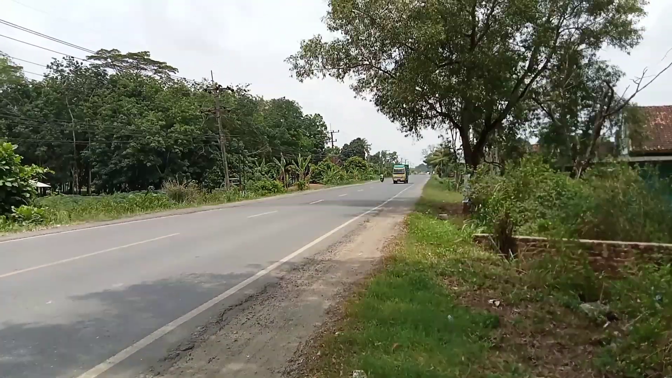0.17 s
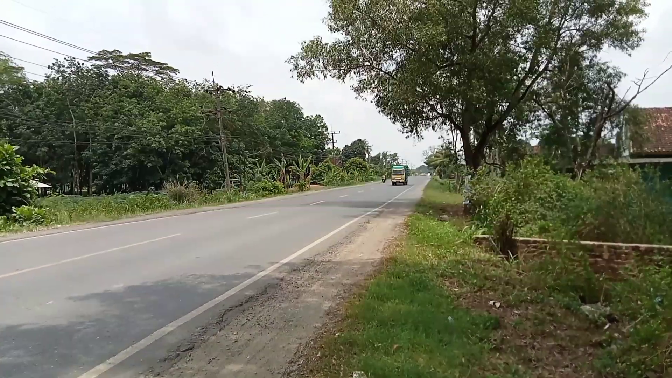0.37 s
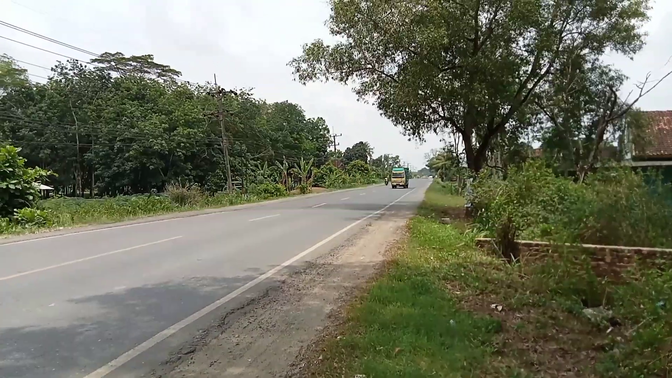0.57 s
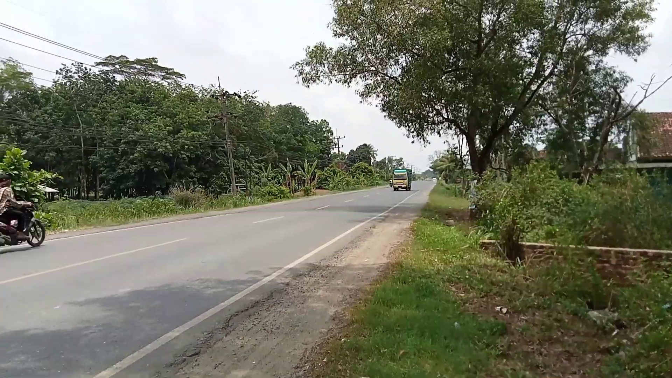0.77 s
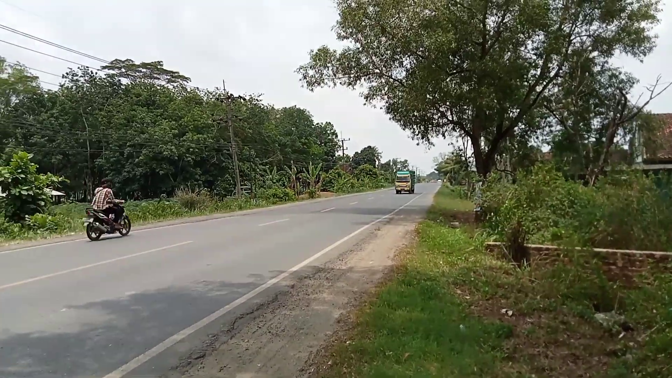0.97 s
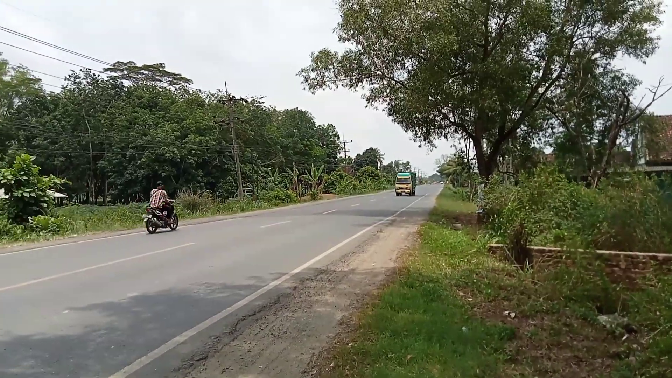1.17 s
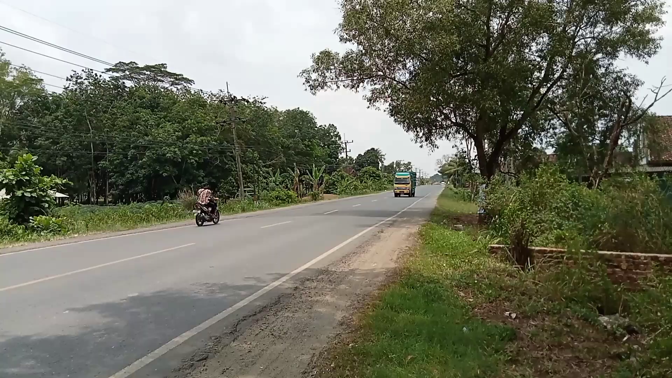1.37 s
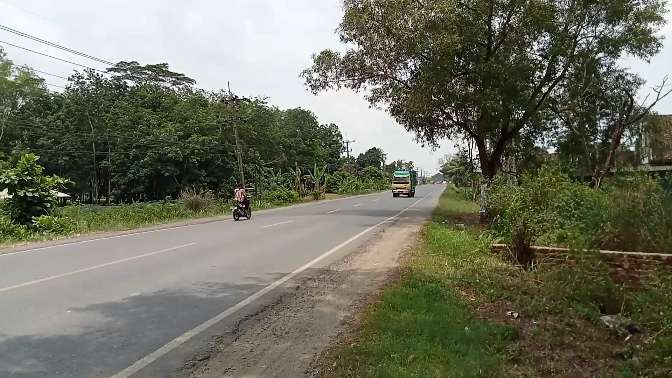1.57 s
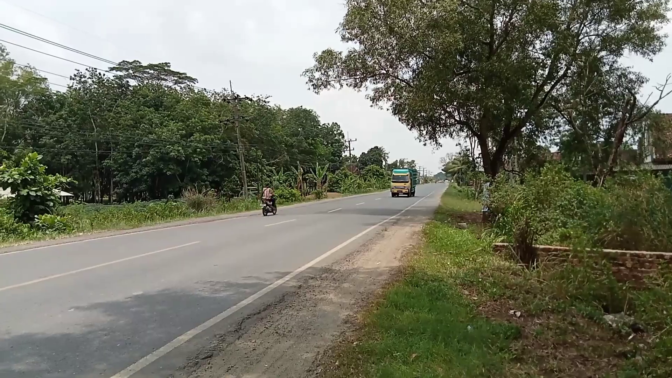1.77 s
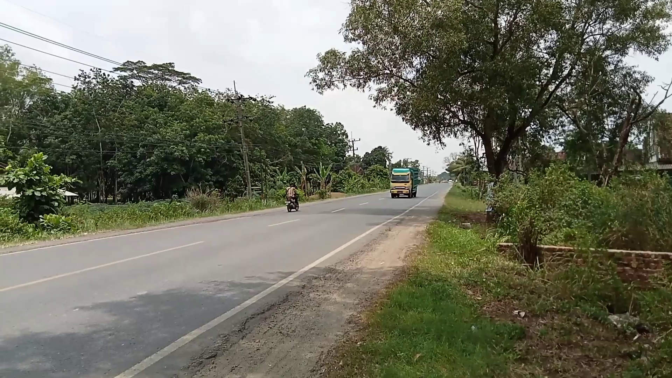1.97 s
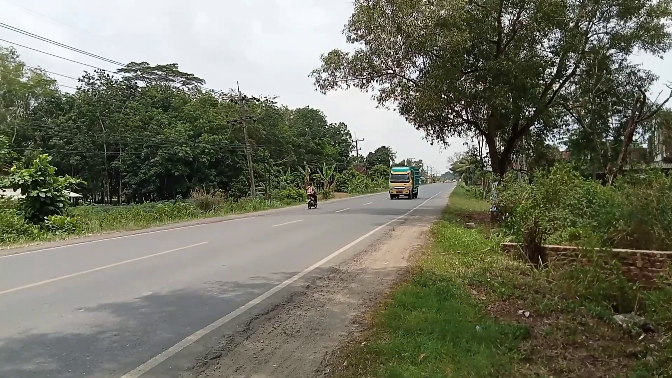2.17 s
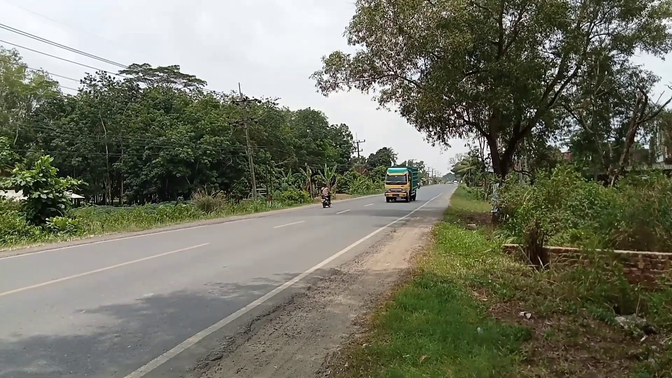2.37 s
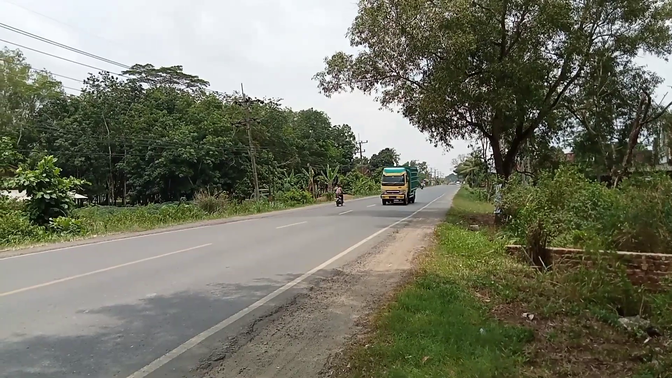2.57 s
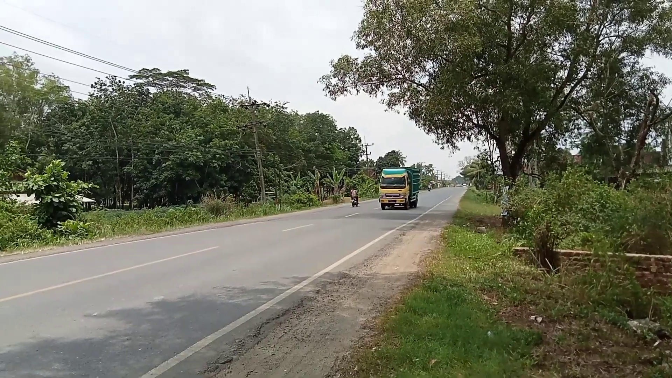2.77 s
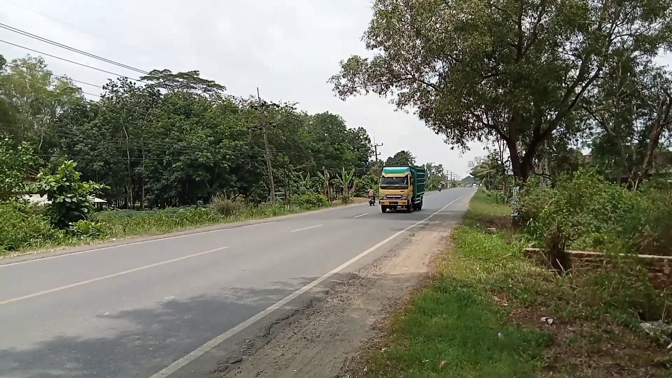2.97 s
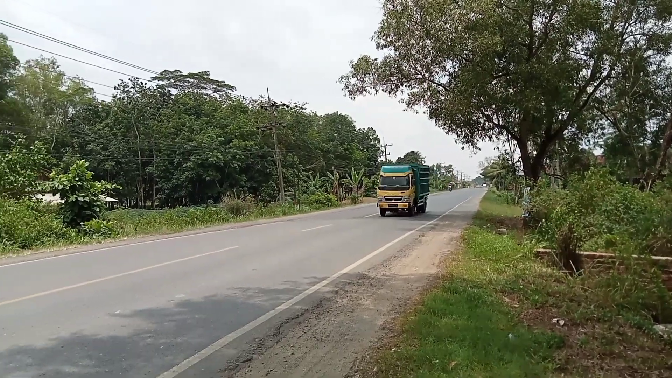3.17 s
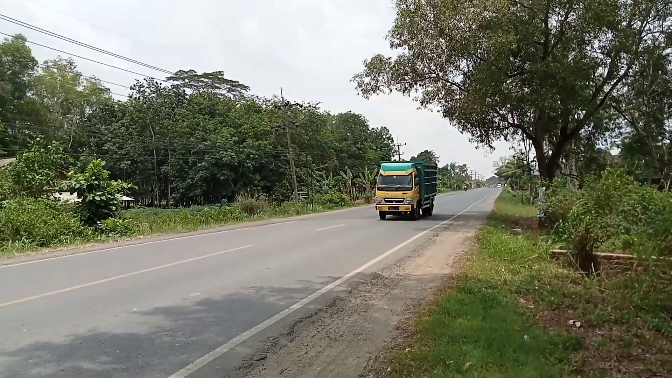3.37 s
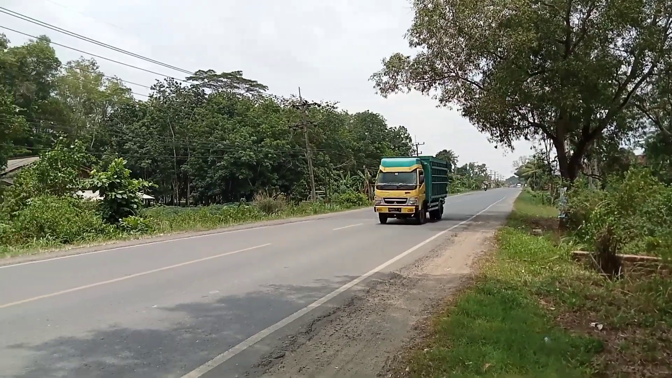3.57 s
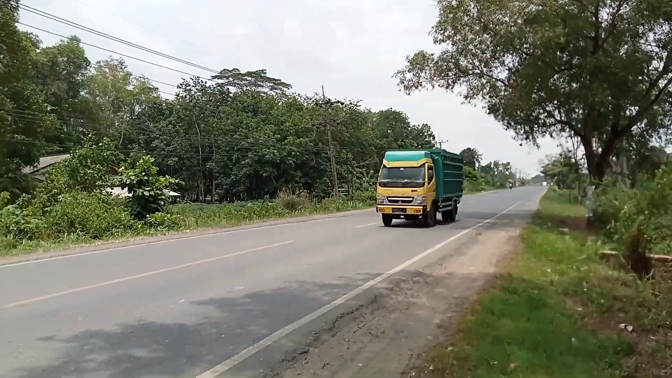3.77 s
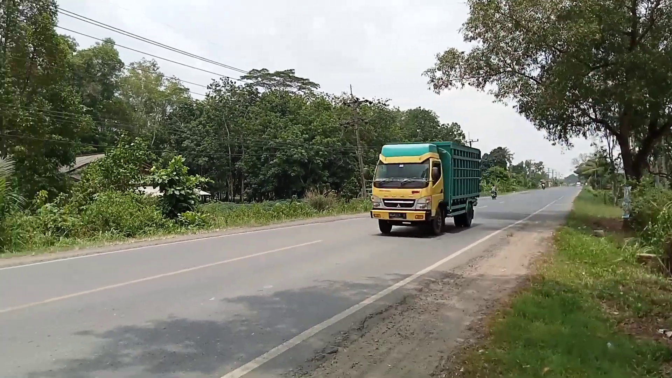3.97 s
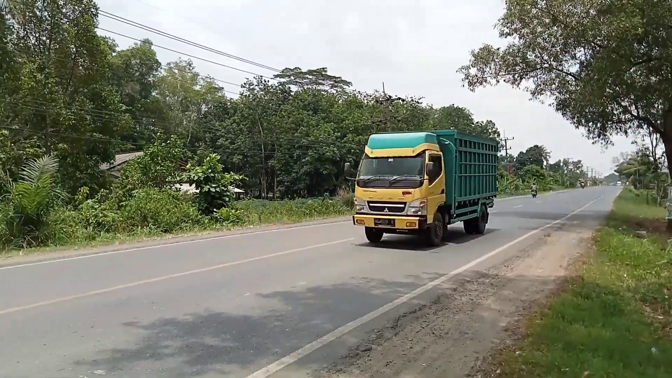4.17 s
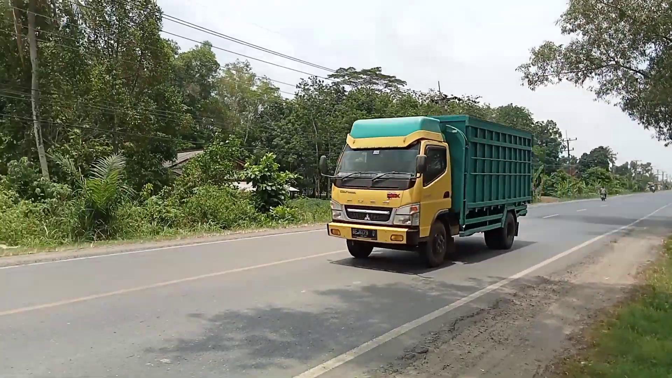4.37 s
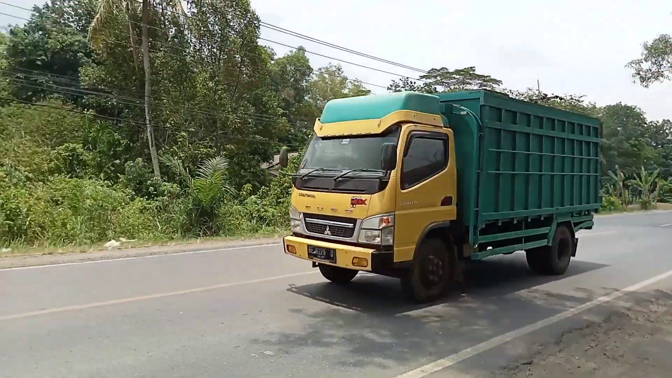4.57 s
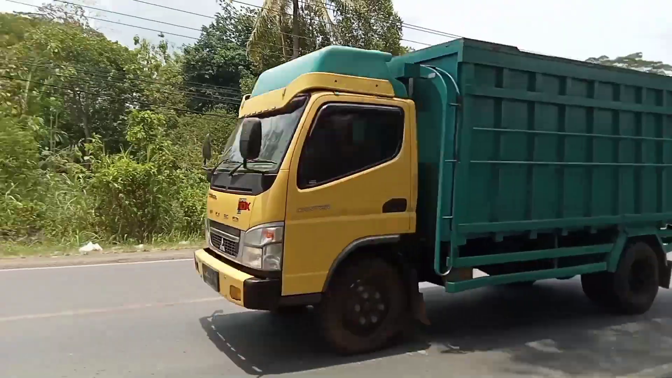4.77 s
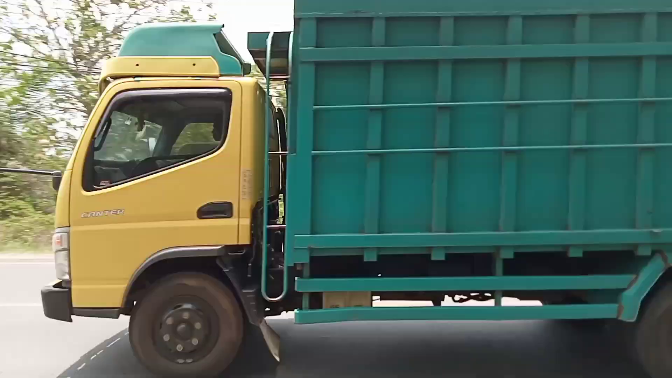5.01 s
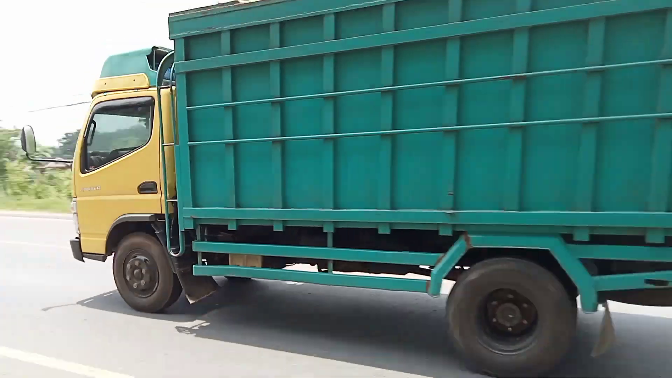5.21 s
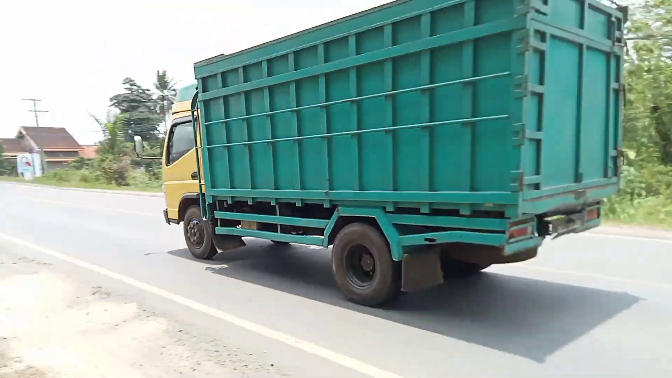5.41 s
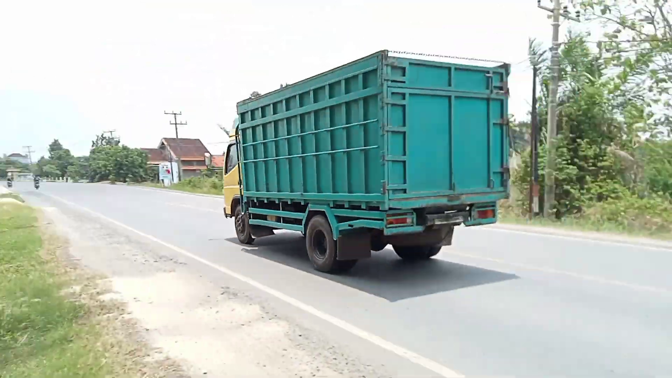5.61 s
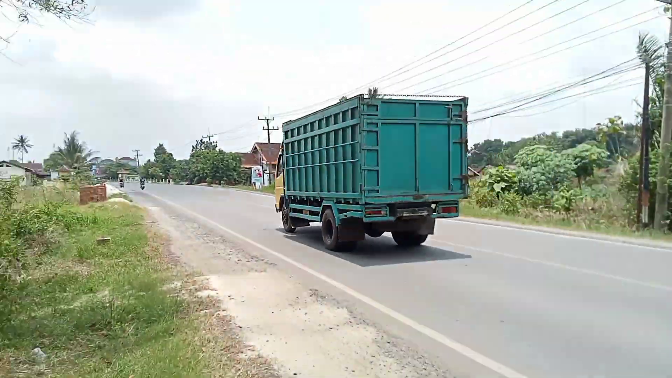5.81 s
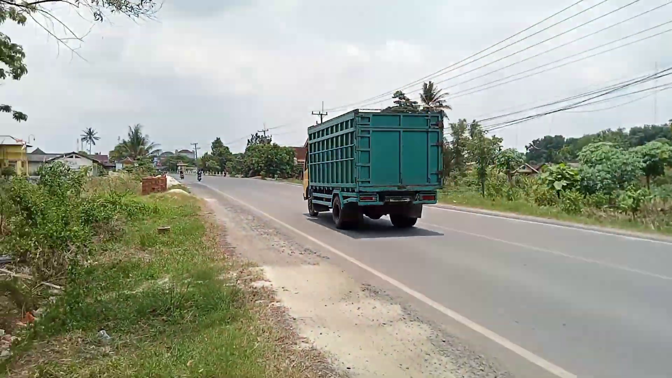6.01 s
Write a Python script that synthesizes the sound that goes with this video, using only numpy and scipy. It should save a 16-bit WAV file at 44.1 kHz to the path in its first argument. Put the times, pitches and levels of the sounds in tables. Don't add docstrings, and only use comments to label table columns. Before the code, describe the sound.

From 0 to 0.06 s a loud, broad burst of traffic noise, then silence until about 0.15 s, when the roadside fades in quickly. A small motorbike passes close at about 0.4 s: rough tyre and air rush throbbing with its firing, buzzing exhaust, thin whine and hiss, shrinking through 2.5 s. Soft bumps thud at 0.6 and 1.7 s; faint grit snaps at 1 and 1.9 s. One faint, high arched bird call at 2.1-2.3 s. Beneath, a distant diesel truck hums low and grows. From 3.1 s crisp stone ticks appear, with a dull bump at 3.4 s. From 4 s the roar swells steeply, ticks sharpening, peaking near 5.15 s as broad, close tyre noise with engine hum and airy turbo whistle. A strong thud and bright ticks come around 5.3 s; the roar then drops, engine pitch lower, until 6 s. Short sliding road echoes colour everything.

```python
import sys
import numpy as np
from scipy import signal
from scipy.fft import rfft, irfft, next_fast_len
from scipy.io import wavfile
from scipy.ndimage import map_coordinates

SR = 44100
rng = np.random.default_rng(int(sys.argv[2]) if len(sys.argv) > 2 else 0)


def field_ratio(decibels):
    return 10 ** (np.asarray(decibels, dtype=float) / 20)


def unload_audio(sound):
    columns = np.transpose(np.atleast_2d(sound))
    steps = np.round(np.clip(columns, -1, 1) * 32767)
    wavfile.write(sys.argv[1], SR, steps.astype(np.int16))


N = 266805

SOUND_M_PER_S = 343
DROPOUT_S = 0.1
EARLIER_DB, BREEZE_DB = -30, -66
TICK_CUT_HZ = 9900
ECHO_LEAD_RAD, ECHO_CUT_HZ, BIKE_WALL_CUT_HZ = 1.25, 4000, 3900
WALL_LOSS_PER_M = 0.0066

# abreast at seconds, speed in m/s, closest distance in m.
TRUCK_PATH = (5.156, 17, 4.57)
BIKE_PATH = (0.41, 14, 4.0)
PART_EDGES_HZ = (45, 450, 1800, 4500, 15800)
# frequency in Hz, density in dB per Hz.
TRUCK_COLOUR = [(45, -7), (90, -11.5), (170, -8.5), (340, -1), (480, -4), (740, 1.5), (1100, -2.5),
                (1450, -2.5), (2000, -3.5), (2700, -5.5), (3600, -10), (5000, -28), (9000, -31.5),
                (15600, -39)]
BIKE_COLOUR = [(45, -8), (80, 0), (160, -3), (300, -6.5), (600, 2.5), (1000, 5.5), (1700, -1.5),
               (2500, -2.5), (3300, -8), (5100, -19), (6500, -17), (9000, -25.5), (12000, -23.5),
               (15600, -23.5)]
# closest level in dB, share of the spreading loss,
# gain from behind in dB, lateness of the pass in seconds, distant floor in dB.
TRUCK_PARTS = [(-22.5, 1.45, -1, 0.08, -50), (-19.5, 1.011, -0.92, 0.018, -60), (-20, 1.19, 2, -0.018, -68),
               (-33, 1.37, -0.5, 0.022, -56)]
BIKE_PARTS = [(-41.5, 0.59, 0.1, 0.01, -50.5), (-34, 1.15, 2.9, 0.082, -62), (-28.5, 0.9, 1.8, 0.012, -54),
              (-40.5, 1.09, 1.2, 0.077, -61.5)]
# time in seconds, gain in dB.
TRUCK_SURFACE = [(1.2, 0.7), (2.0, -1.2), (2.45, 1.2), (2.9, 0.8), (3.3, -0.4), (3.7, 0), (4.25, -0.3),
                 (4.5, 1), (4.65, 0), (4.9, 1), (5.1, -0.8), (5.3, -0.2), (5.45, 0.4), (5.75, 0.7),
                 (6.04, -0.5)]
BIKE_THROTTLE = [(0.25, -2.5), (0.39, 1), (0.6, 0), (0.8, 0.1), (1.1, -0.4), (1.37, 2.3), (1.55, 2.5),
                 (1.8, -0.9), (2.4, -2)]

# time in seconds, firings per second.
DIESEL_REVS = [(0.2, 55.3), (1.5, 55.6), (2.8, 57.2), (3.4, 57.5), (4.3, 56.7), (6.05, 56.3)]
# multiple of the firing rate, level in dB.
DIESEL_ORDERS = [(2, -4), (2.5, -9), (3, 0), (4, -4), (6, -1), (12, -6)]
BIKE_ORDERS = [(4, -5), (5, 0), (6, -2), (7, -3), (8, -6), (9, -10), (15, -8), (16, -9)]
# closest level in dB, share of the spreading loss, gain from behind in dB, lateness in seconds.
UPPER_ORDERS = (-35.5, 1.37, -1.5, 0.1)
TAILPIPE = (-28, 6, -1.5, 0.16)
# time in seconds, level in dB.
FAR_NOTE = [(0.2, -49.5), (0.8, -43.5), (1.35, -51), (1.9, -43), (2.8, -48), (3.1, -48.5), (3.9, -52),
            (4.2, -44), (4.8, -72), (5.75, -53), (6.05, -54)]
# time in seconds, firings per second, fifth-order level in dB.
BIKE_FIRING = [(0.15, 34.6, -58), (0.4, 34.1, -47), (0.9, 33.2, -49), (1.4, 32.9, -53), (1.9, 32.7, -57),
               (2.6, 32.4, -63), (3.5, 32.2, -75)]

# (closest level in dB, share of the spreading loss, gain from behind in dB, lateness in seconds).
TURBO = (6760, 30, 190), (-42, 0.9, 2, 0.01)
TREAD = (3100, 600, 1), (-60, 0.84, -25, -1.2)
HIGH_WHINE = (2290, 270, 1), (-35.5, 0.84, 8.5, -1.67)
# time in seconds, centre in Hz, level in
# dB.
LOW_WHINE = [(0.15, 1368, -66), (0.25, 1372, -32.5), (0.45, 1384, -54), (0.7, 1354, -52), (1.0, 1346, -40.5),
             (1.5, 1324, -45), (2.0, 1278, -62), (2.6, 1330, -70)]
FINS = [(0.25, 9250, -71), (0.5, 8980, -48.5), (0.72, 8860, -45), (0.95, 8530, -53), (1.45, 8500, -52.5),
        (1.8, 9150, -55), (2.2, 9270, -64)]
MUFFLER = [(0.9, 10330, -74), (1.3, 10400, -60), (1.85, 10650, -56), (2.3, 10570, -72)]

# lag far off, change abreast and change from behind, all in ms.
TRUCK_WALL_LAG = (1.75, -0.35, 0.076)
BIKE_WALL_LAG = (1.672, -0.62, 0.009)
TRUCK_ROAD_LAG = (0.79, -0.066, 0.092)
BIKE_ROAD_LAG = (0.857, -0.031, 0.0046)
TRUCK_WALL_SHARE = (0.87, -0.34, 0.01)
BIKE_WALL_SHARE = (0.46, -0.22, 0.01)
TRUCK_ROAD_SHARE = (0.38, -0.36, -0.0064)
BIKE_ROAD_SHARE = (0.44, -0.18, 0.0081)

# time in seconds, peak in dB, centre in Hz.
SNAPS = [(0.991, -44, 15000), (1.915, -39, 13000), (3.749, -42, 13500),
         (3.0969, -43, 14600), (3.1288, -55, 11600), (3.2844, -39, 14700), (3.4421, -51, 11800),
         (3.7614, -49.5, 14100), (3.9144, -36, 15100), (4.0751, -36, 15400), (4.386, -26.5, 13700),
         (4.3983, -25, 11200), (4.559, -28, 11900), (4.778, -34.5, 14700), (4.9911, -39, 12000),
         (5.26, -16.5, 13300), (5.3714, -18, 11200)]
# time in seconds, peak in dB, pitch in Hz.
THUDS = [
    (0.6, -28, 280),
    (1.742, -28, 122),
    (3.42, -29, 200),
    (5.27, -21, 110),
]
# time in seconds, third partial in Hz, third partial in dB, fourth partial in dB.
BIRD = [
    (2.095, 4800, -75, -80),
    (2.108, 4960, -52, -66),
    (2.148, 5230, -51, -52),
    (2.18, 5210, -50, -55),
    (2.205, 5089, -52, -53),
    (2.255, 4817, -55, -65),
    (2.268, 4780, -75, -80),
]
# frequency in Hz, density in dB per Hz.
EARLIER = [(270, -1.5), (820, -14), (1050, -2.5), (1400, -11), (2100, 0), (4500, -9), (5600, -21),
           (15400, -30.5)]
# centre in Hz, width in Hz, lift in dB.
MIC_PEAKS = [(8870, 1040, 6)]
# time in seconds, gain in dB.
FADER = [(0, 11.5), (0.03, 6.5), (0.055, 4), (0.058, -56), (0.075, -82), (0.14, -85), (0.158, -28.5),
         (0.2, -7), (0.26, -2.5)]


def truck():
    speed = TRUCK_PATH[1]
    heading = passing(TRUCK_PATH, TAILPIPE[3])[2]
    firing_hz = in_time(DIESEL_REVS)[0] * (1 - speed / SOUND_M_PER_S * heading)
    note_db = heard_db(TRUCK_PATH, *TAILPIPE, in_time(FAR_NOTE)[0])
    note = field_ratio(note_db) * orders(firing_hz, [(1, 0)], waver_db=2.5, waver_rad=.4)
    upper = orders(firing_hz, DIESEL_ORDERS, waver_db=4.5, waver_rad=1.3)
    upper = field_ratio(heard_db(TRUCK_PATH, *UPPER_ORDERS)) * upper
    levels = [heard_db(TRUCK_PATH, *part) + in_time(TRUCK_SURFACE)[0] for part in TRUCK_PARTS]
    rolling = rolling_noise(levels, TRUCK_COLOUR, gust_db=.35, patchy_db=1.3)
    whistles = ridge(TRUCK_PATH, TREAD, width_hz=220) + ridge(TRUCK_PATH, TURBO, width_hz=620)
    return rolling + upper, note + whistles


def motorbike():
    firing_hz, level_db = in_time(BIKE_FIRING)
    throb = field_ratio(0.59 * np.sin(2 * np.pi * np.cumsum(firing_hz) / SR))
    exhaust = field_ratio(level_db) * orders(firing_hz, BIKE_ORDERS, waver_db=3.0, waver_rad=.45)
    whines = whistle(*in_time(LOW_WHINE), width_hz=95) + ridge(BIKE_PATH, HIGH_WHINE, width_hz=520)
    hiss = whistle(*in_time(FINS), width_hz=1100) + whistle(*in_time(MUFFLER), width_hz=1200)
    levels = [heard_db(BIKE_PATH, *part) + in_time(BIKE_THROTTLE)[0] for part in BIKE_PARTS]
    rolling = rolling_noise(levels, BIKE_COLOUR, gust_db=.8, patchy_db=1.2)
    return throb * rolling + exhaust, throb * (whines + hiss)


def rolling_noise(levels, colour, gust_db, patchy_db, far_dulling=0.18):
    out = 0
    white = rng.standard_normal((2, N))
    gust = drift(4) + .5 * drift(25)
    points_hz, points_db = np.transpose(colour)
    for low, high, level_db in zip(PART_EDGES_HZ, PART_EDGES_HZ[1:], levels):
        edges = np.geomspace(low, high, round(3 * np.log2(high / low)) + 1)
        part = 0
        for k, band in enumerate(zip(edges, edges[1:])):
            band_db = np.interp(np.log(band).mean(), np.log(points_hz), points_db)
            noise = signal.sosfilt(signal.butter(2, band, "band", fs=SR, output="sos"), white[k % 2])
            octaves_up = np.log2(band[0] / low) * (low > 1000)
            air_loss_db = far_dulling * (level_db.max() - level_db) * octaves_up
            flicker_db = patchy_db * (drift(3) + .7 * drift(15))
            part = part + field_ratio(band_db - air_loss_db + flicker_db) * noise
        out = out + field_ratio(level_db) * rms_one(part * field_ratio(gust_db * gust))
    return out


def orders(firing_hz, table, waver_db, waver_rad):
    phase = 2 * np.pi * np.cumsum(firing_hz) / SR
    out = 0
    for multiple, level_db in table:
        strength = np.sqrt(2) * field_ratio(level_db + waver_db * drift(4))
        out = out + strength * np.sin(multiple * phase + waver_rad * drift(5))
    return out


def ridge(path, rule, width_hz):
    (far_hz, rise_hz, fall_hz), level = rule
    return whistle(by_angle(path, far_hz, rise_hz, -fall_hz), heard_db(path, *level), width_hz)


def whistle(centre_hz, level_db, width_hz):
    low_pass = signal.butter(2, width_hz / 2, fs=SR, output="sos")
    slow = signal.sosfilt(low_pass, rng.standard_normal((2, N)))
    phase = 2 * np.pi * np.cumsum(centre_hz) / SR
    band = slow[0] * np.cos(phase) + slow[1] * np.sin(phase)
    return field_ratio(level_db + 1.6 * drift(6)) * rms_one(band)


def passing(path, later_s=0.0):
    abreast_s, speed, closest = path
    along = speed * (np.arange(N) / SR - abreast_s - later_s)
    distance = np.hypot(along, closest)
    return distance, closest / distance, along / distance


def heard_db(path, closest_db, spreading, behind_db, later_s, floor_db=-200):
    _, abreast, heading = passing(path, later_s)
    direct_db = closest_db + spreading * 20 * np.log10(abreast) + behind_db * heading
    return 10 * np.log10(field_ratio(direct_db) ** 2 + field_ratio(floor_db) ** 2)


def by_angle(path, far, change_abreast, change_behind, order=1):
    _, abreast, heading = passing(path)
    return far + change_abreast * abreast ** order + change_behind * heading


def with_echo(x, lag_ms, strength, cut_hz=ECHO_CUT_HZ):
    size = next_fast_len(N)
    dulling = 1 / (1 + (np.fft.rfftfreq(size, 1 / SR) / cut_hz) ** 2)
    turned = irfft(rfft(x, size) * dulling * np.exp(1j * ECHO_LEAD_RAD), size)[:N]
    late = map_coordinates(turned, [np.arange(N) - lag_ms * SR / 1000], order=1)
    return x + strength * late


def knocks(events, seconds, sharpness):
    out = np.zeros(N)
    t = np.arange(2048) / SR
    noises = rng.standard_normal((len(events), len(t)))
    for (s, peak_db, hz), noise in zip(events, noises):
        burst = resonance(noise * np.exp(-t / seconds), hz, hz / sharpness)
        at = round(s * SR)
        out[at:at + len(t)] += field_ratio(peak_db) * burst / np.abs(burst).max()
    return out


def thuds():
    t = np.arange(N) / SR
    out = 0
    for s, peak_db, hz in THUDS:
        swell = np.exp(-((t - s) * hz / 2.0) ** 2)
        out = out + field_ratio(peak_db) * swell * np.sin(2 * np.pi * hz * (t - s))
    return out


def bird():
    third_hz, third_db, fourth_db = in_time(BIRD)
    phase = 2 * np.pi * np.cumsum(third_hz) / SR
    call = field_ratio(third_db) * np.sin(phase) + field_ratio(fourth_db) * np.sin(phase * 4 / 3)
    return np.sqrt(2) * call * field_ratio(3.2 * drift(60))


def earlier_traffic():
    points_hz, points_db = np.transpose(EARLIER)
    log_hz = np.log(np.fft.rfftfreq(8192, 1 / SR) + 1)
    shape = field_ratio(np.interp(log_hz, np.log(points_hz), points_db))
    noise = rms_one(irfft(rfft(rng.standard_normal(8192)) * shape))
    return field_ratio(EARLIER_DB) * np.resize(noise, N)


def breeze():
    band = signal.butter(2, [12, 45], "band", fs=SR, output="sos")
    low = signal.sosfilt(band, rng.standard_normal(N))
    return field_ratio(BREEZE_DB + 3.0 * drift(2.5)) * rms_one(low)


def resonance(x, hz, width_hz):
    r = np.exp(-np.pi * width_hz / SR)
    poles = [1, -2 * r * np.cos(2 * np.pi * hz / SR), r * r]
    return signal.lfilter([(1 - r * r) / 2, 0, (r * r - 1) / 2], poles, x + 1e-18)


def drift(rate):
    r = np.exp(-80 * np.pi * rate / SR)
    slow = signal.lfilter([1], [1, -2 * r, r * r], rng.standard_normal(N // 40 + 2002))[2000:]
    return np.interp(np.arange(N) / 40, np.arange(len(slow)), rms_one(slow))


def in_time(rows):
    s, *columns = np.transpose(rows)
    return [np.interp(np.arange(N) / SR, s, c) for c in columns]


def rms_one(x):
    return x / np.sqrt(np.mean(x ** 2) + 1e-20)


def scene():
    truck_body, truck_narrow = truck()
    road_lag, road_share = by_angle(TRUCK_PATH, *TRUCK_ROAD_LAG), by_angle(TRUCK_PATH, *TRUCK_ROAD_SHARE)
    truck_body = with_echo(truck_body, road_lag, road_share)
    wall_share = by_angle(TRUCK_PATH, *TRUCK_WALL_SHARE) - WALL_LOSS_PER_M * passing(TRUCK_PATH)[0]
    truck_body = with_echo(truck_body, by_angle(TRUCK_PATH, *TRUCK_WALL_LAG), wall_share)

    bike_body, bike_narrow = motorbike()
    road_lag, road_share = by_angle(BIKE_PATH, *BIKE_ROAD_LAG), by_angle(BIKE_PATH, *BIKE_ROAD_SHARE)
    bike_body = with_echo(bike_body, road_lag, road_share)
    wall_lag = by_angle(BIKE_PATH, *BIKE_WALL_LAG, order=2)
    wall_share = by_angle(BIKE_PATH, *BIKE_WALL_SHARE)
    bike_body = with_echo(bike_body, wall_lag, wall_share, BIKE_WALL_CUT_HZ)

    snaps = knocks(SNAPS, seconds=.0014, sharpness=4.0)
    snaps = signal.sosfilt(signal.butter(4, TICK_CUT_HZ, "high", fs=SR, output="sos"), snaps)
    small = snaps + thuds() + bird()
    roadside = truck_body + bike_body + truck_narrow + bike_narrow + small
    before_dropout = np.arange(N) < DROPOUT_S * SR
    return np.where(before_dropout, earlier_traffic(), roadside)[None]


def top_cut(x):
    return signal.sosfilt(signal.butter(12, 15510, fs=SR, output="sos"), x)


def record(dry):
    x = dry
    for hz, width_hz, lift_db in MIC_PEAKS:
        x = x + (field_ratio(lift_db) - 1) * resonance(dry, hz, width_hz)
    x = signal.sosfilt(signal.butter(4, 46, "high", fs=SR, output="sos"), x) + breeze()
    return top_cut(x * field_ratio(in_time(FADER)[0]))


dry = scene()
out = record(dry)
unload_audio(out)
```